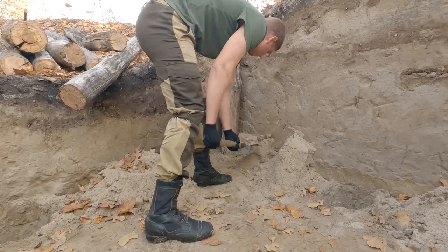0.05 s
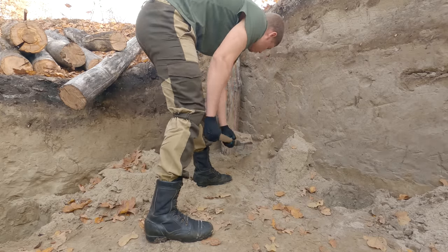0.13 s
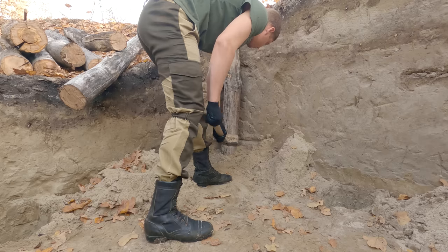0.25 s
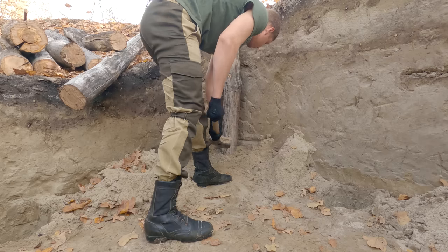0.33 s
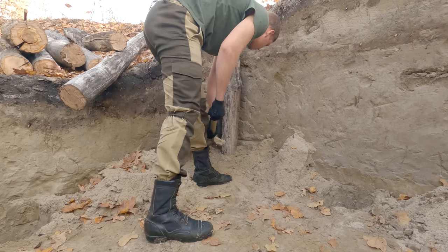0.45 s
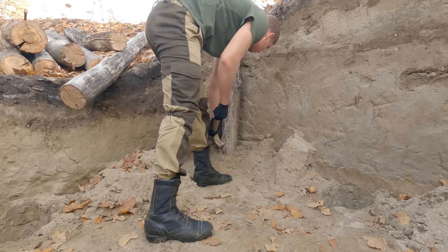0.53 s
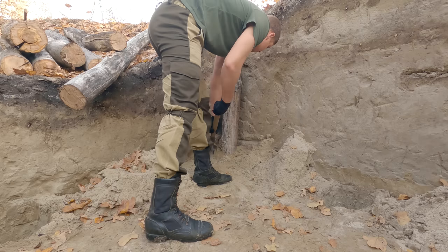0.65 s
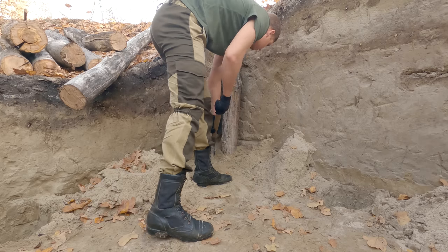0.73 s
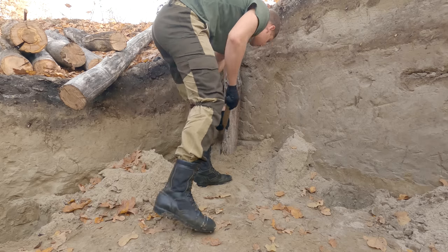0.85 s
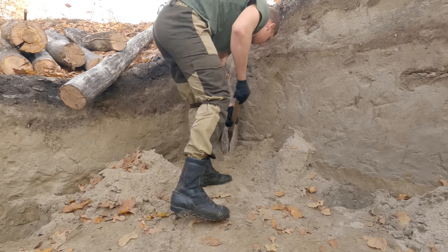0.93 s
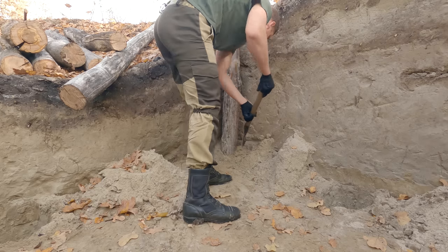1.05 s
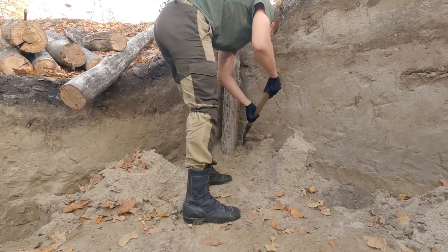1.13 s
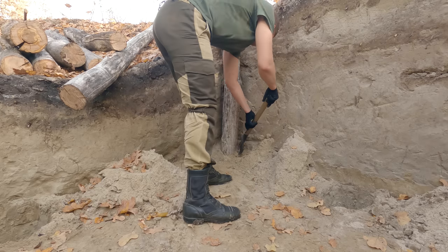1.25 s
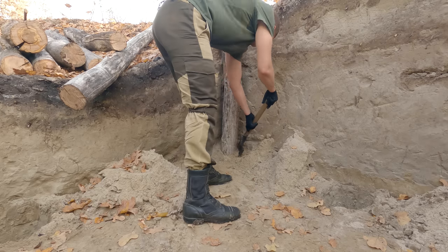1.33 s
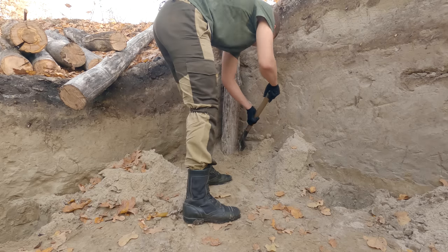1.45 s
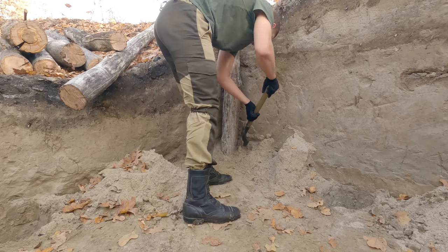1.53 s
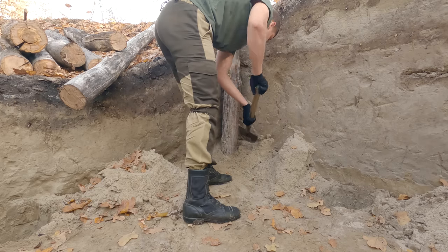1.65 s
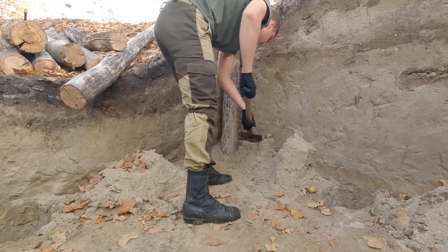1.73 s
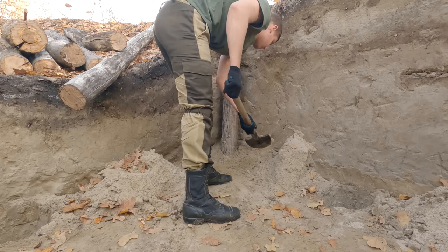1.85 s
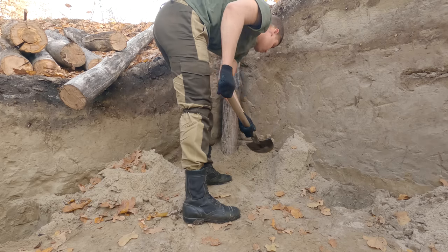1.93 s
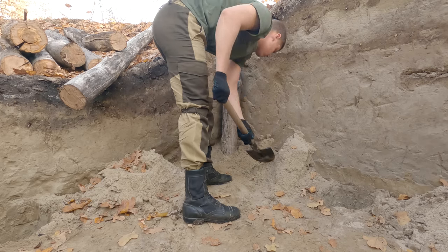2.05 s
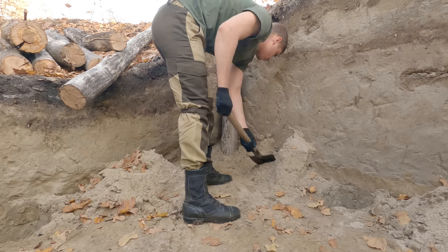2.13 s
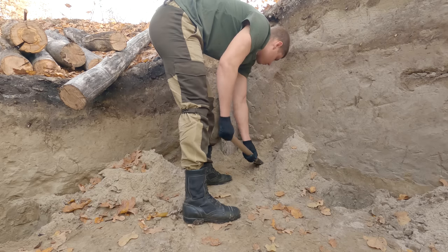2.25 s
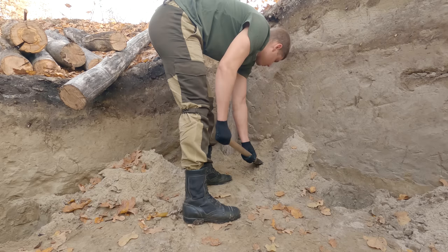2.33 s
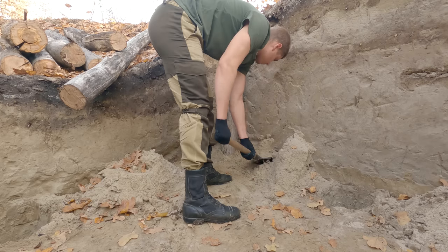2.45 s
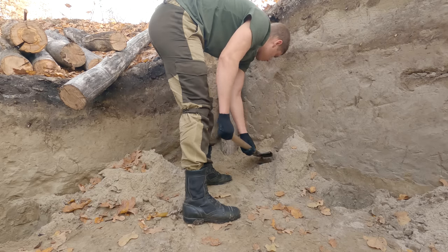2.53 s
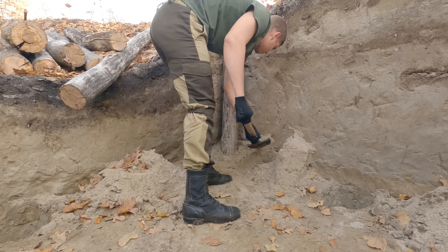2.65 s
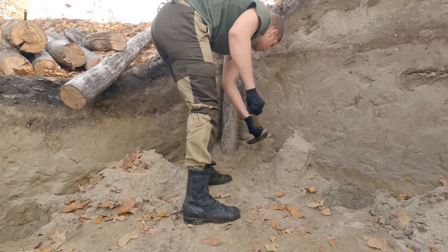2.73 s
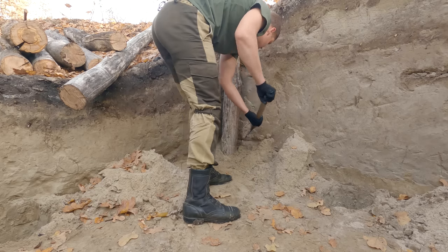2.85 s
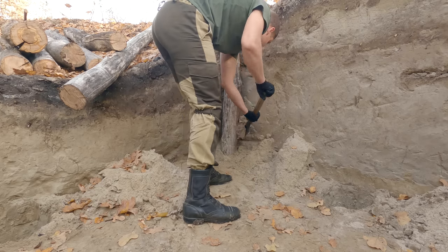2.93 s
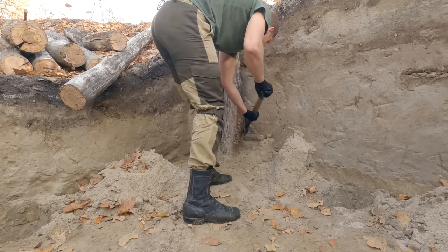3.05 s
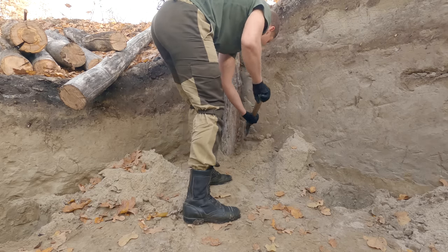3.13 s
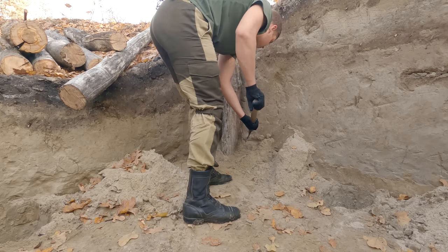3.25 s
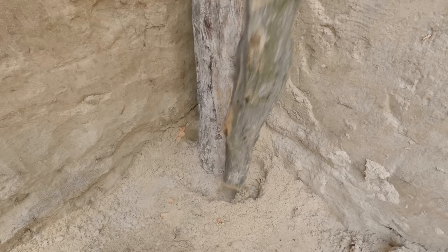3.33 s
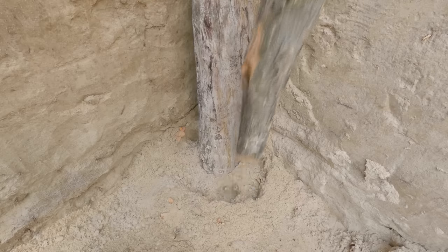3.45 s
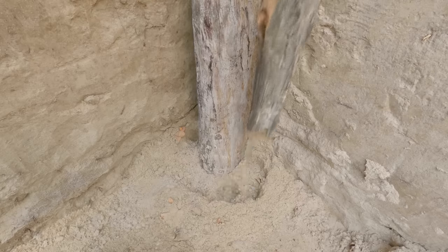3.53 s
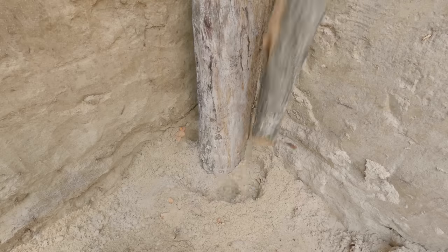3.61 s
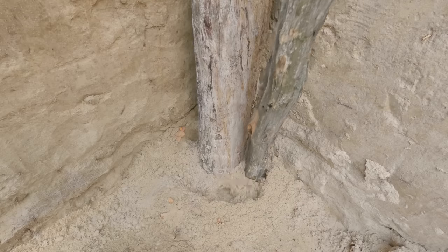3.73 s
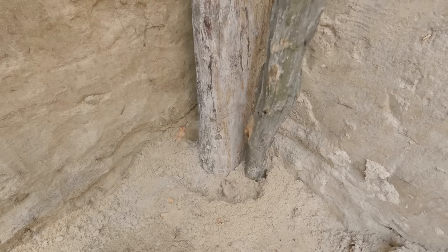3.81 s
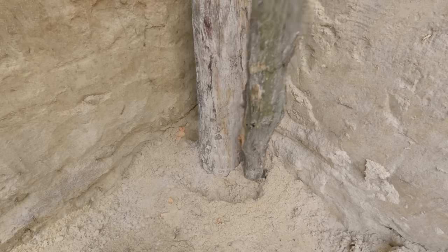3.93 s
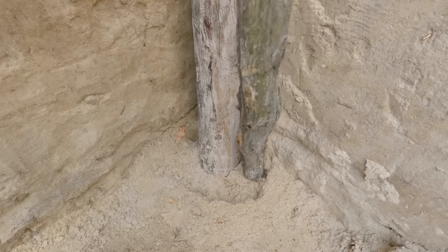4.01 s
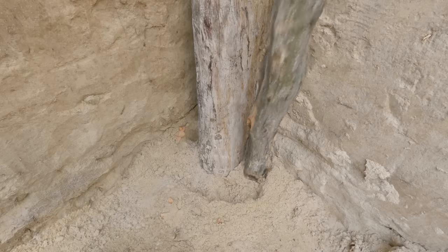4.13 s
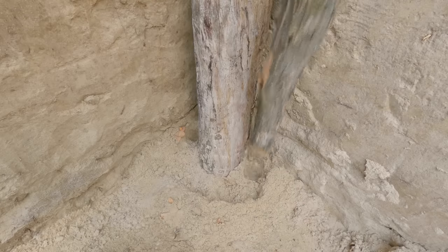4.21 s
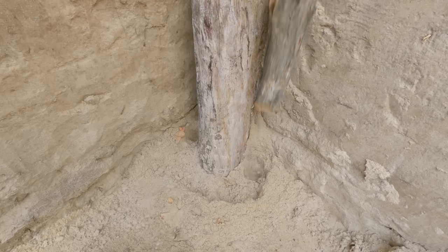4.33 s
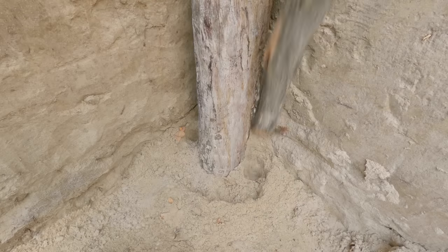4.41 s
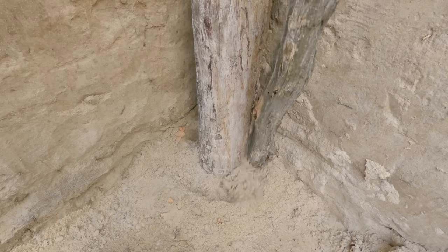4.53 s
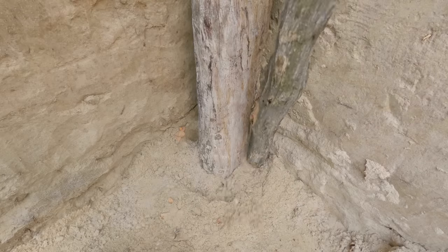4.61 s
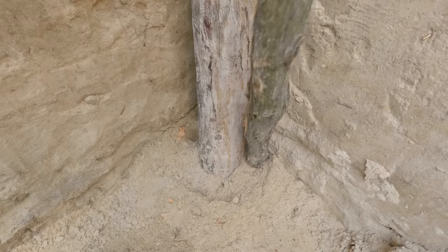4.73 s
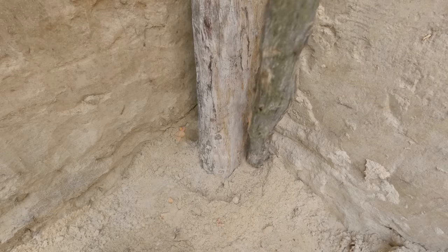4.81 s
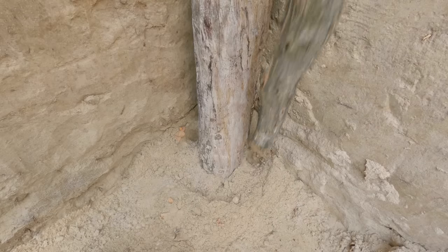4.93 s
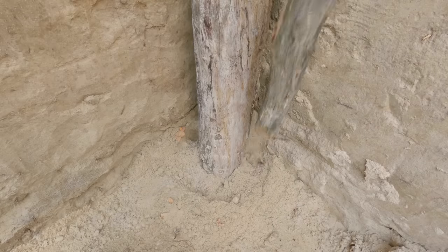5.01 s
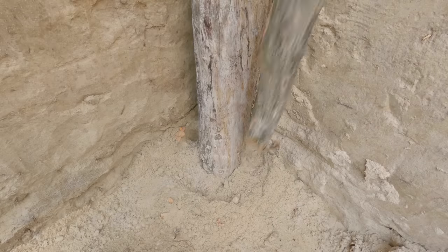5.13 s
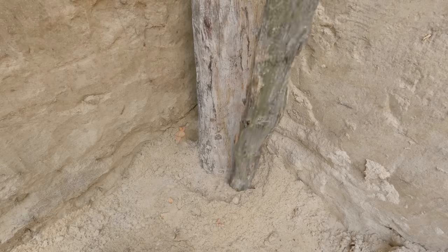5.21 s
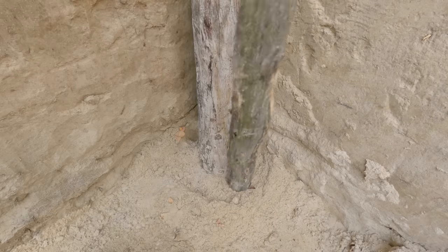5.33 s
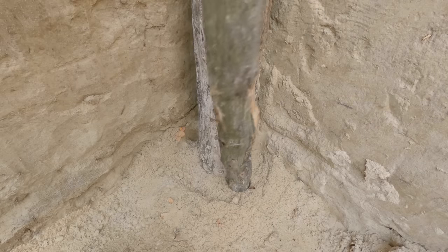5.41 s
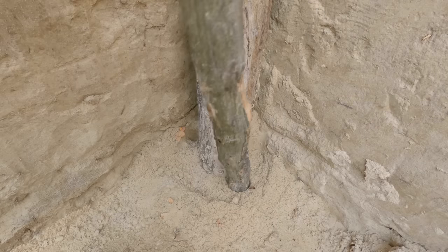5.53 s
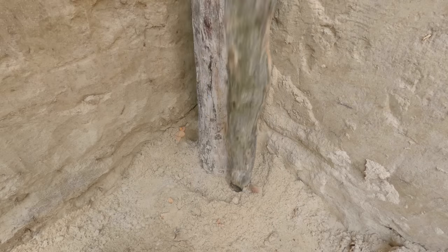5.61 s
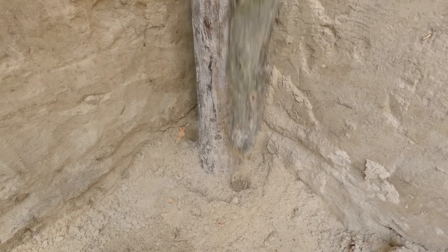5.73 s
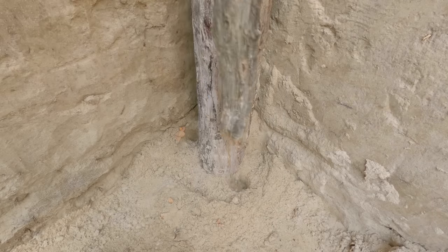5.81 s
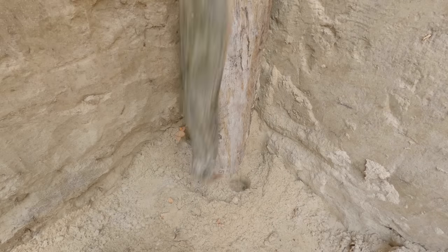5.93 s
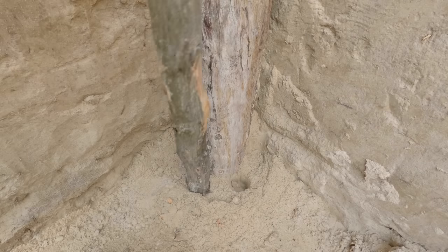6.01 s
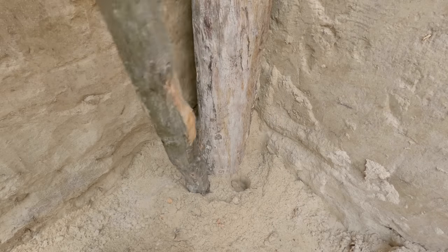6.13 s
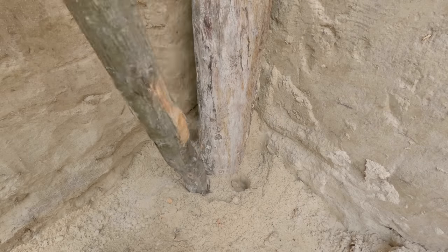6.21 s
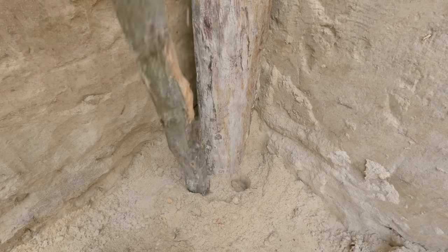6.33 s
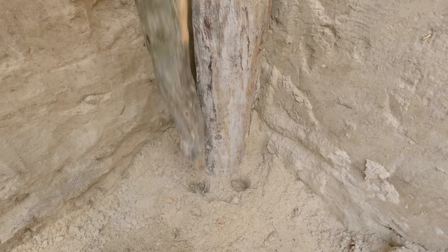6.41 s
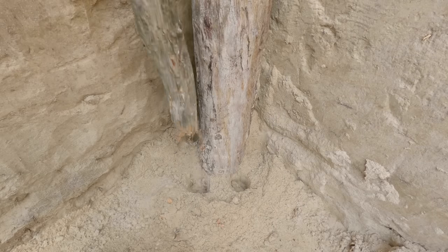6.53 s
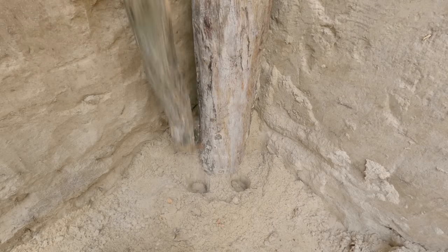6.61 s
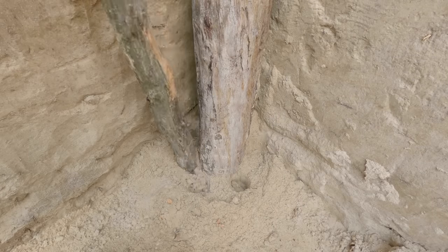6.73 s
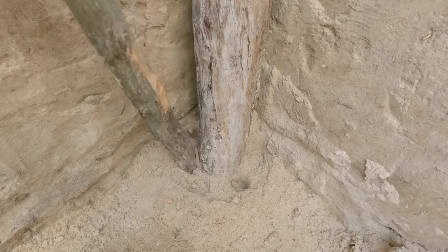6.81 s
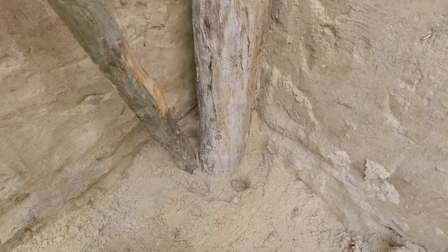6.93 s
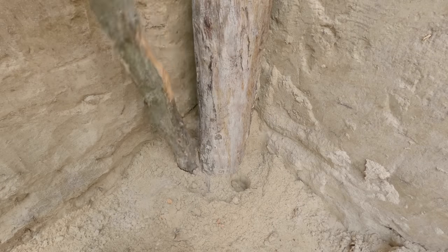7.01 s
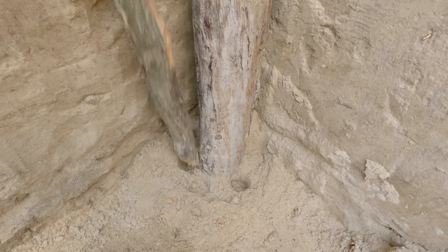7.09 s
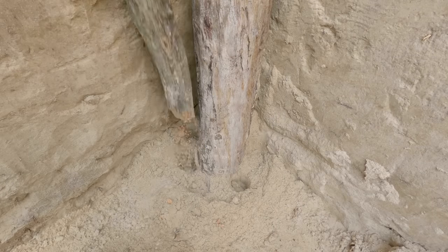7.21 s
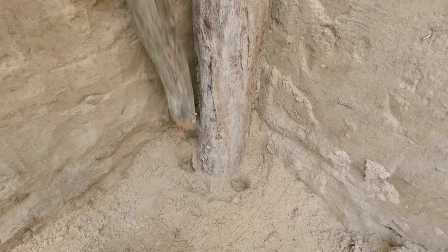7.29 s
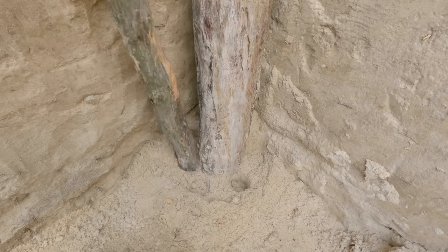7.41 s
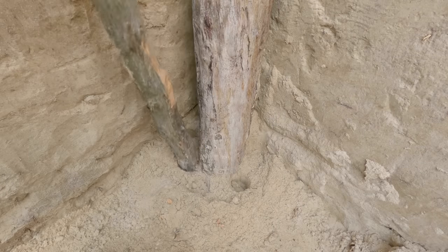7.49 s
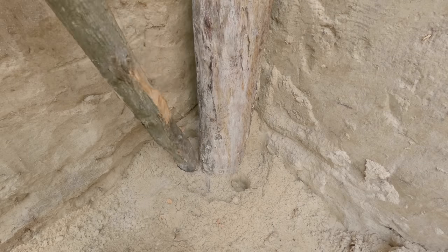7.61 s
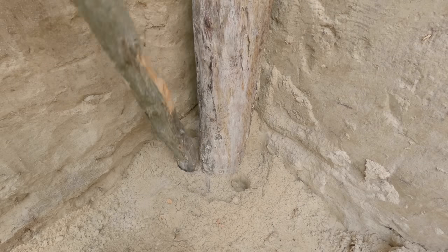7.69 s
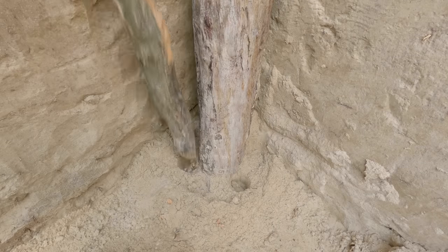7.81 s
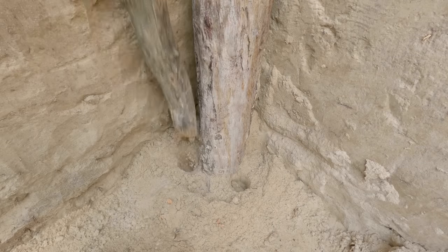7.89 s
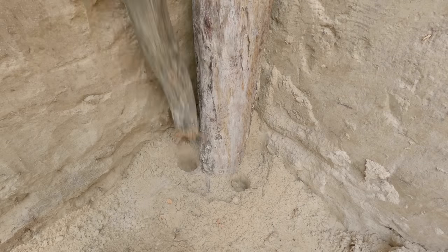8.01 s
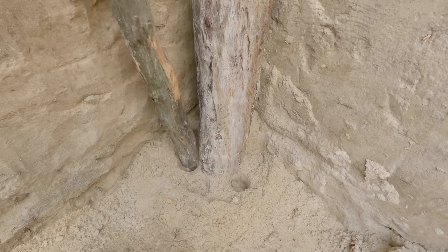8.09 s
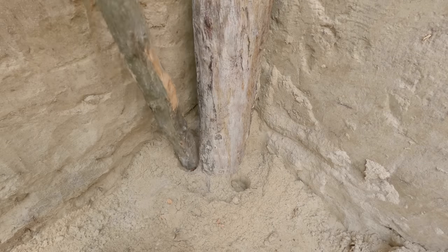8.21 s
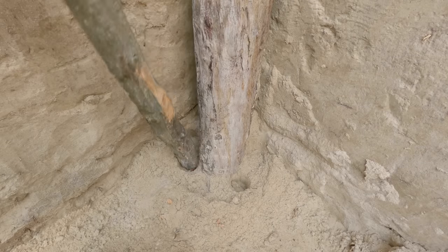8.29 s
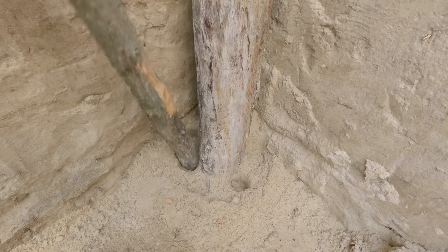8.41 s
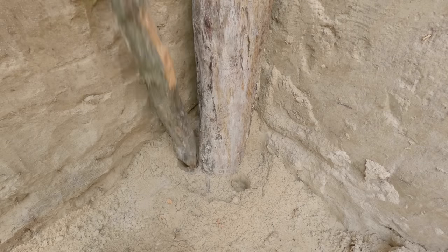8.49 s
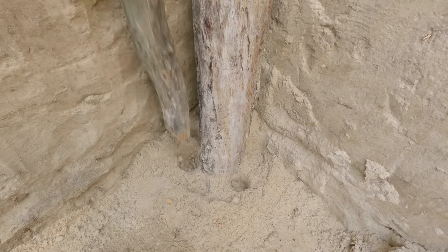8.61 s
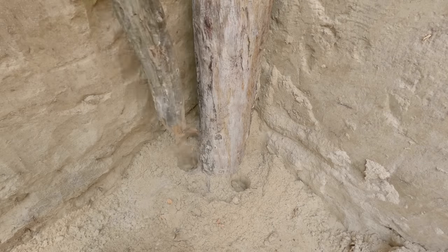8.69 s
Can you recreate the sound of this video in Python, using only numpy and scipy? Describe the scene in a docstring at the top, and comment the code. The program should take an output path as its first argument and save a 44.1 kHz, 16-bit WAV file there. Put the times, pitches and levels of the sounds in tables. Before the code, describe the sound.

Outdoors in a sandy pit, dry leaves hiss faintly and air rumbles softly, with light buffeting on the microphone. At a slight distance a shovel gives two knocks around 0.7 s, another at 1.1 and a harder, brighter metallic clack at 1.3, followed by gritty scraping to 1.4 and fainter sliding until about 2. A soft tap and clearer scrapes come at 2.2-2.3, then a light knock at 3.1. From 3.3 s the sound is close and drier, with a deeper air rumble. A log rams the sand beside a post at 3.8, 4.6, 5.3, 6.1, 6.8, 7.5 and 8.2 s: deep, short thuds with sandy crunch and woody knocks, the one at 6.1 mostly ground. Between them sand trickles, grit ticks, notably near 5.2, and the log clacks or rubs against the post, especially around 4.5, 5.3, 7.5 and 8.2.

```python
"""A shovel scrapes and knocks in a sand pit, then, from close by, a log thuds seven times into the sand by a post.
Behind them leaves hiss and air rumbles; sand crunches and slides, and the log also clacks against the post.
Struck wood, metal and ground are sums of dying tones; sand is clumped random grains that ring the tool.
Leaves and air are coloured noise; short echoes and a noise tail place the digging between sand walls."""
import sys
import numpy as np
from scipy import signal
from scipy.fft import rfft, irfft
from scipy.io import wavfile

SR = 44100
rng = np.random.default_rng(int(sys.argv[2]) if len(sys.argv) > 2 else 0)


def generate_wav(sig):
    """Save sig (samples, or channels by samples) to the path in sys.argv[1] as 16-bit PCM at SR."""
    pcm = np.round(np.clip(np.atleast_2d(sig).T, -1, 1) * 32767).astype(np.int16)
    wavfile.write(sys.argv[1], SR, pcm)


N = 385875
TIME = np.arange(N) / SR  # seconds

# In the tables, levels in dB are relative: a sound's own gain may come on top.
# Tones give their pitch and t60 (time to fade by 60 dB) before any pitch or damping factor.

# Still air in the open pit, then down at the post. Each row: frequency in Hz, level in dB per Hz.
FAR_AIR_COLOUR = [(70, -7), (110, -15), (175, 2.5), (230, -3), (300, 4), (420, -26), (800, -41),
                  (2000, -53)]
NEAR_AIR_COLOUR = [(12, -27), (28, -8.5), (52, 9.5), (80, 1.5), (110, -2.5), (150, -23.5), (220, -17),
                   (350, -27.5), (500, -34), (800, -44.5), (2000, -75)]
FAR_AIR_DB, NEAR_AIR_DB = -61.5, -44.5
CLOSE_S = 3.3  # from here on the air is heard down at the post
# Air buffeting the microphone. Each row: frequency in Hz, level in dB per Hz.
GUST_COLOUR = [(12, 5), (24, -7), (37, 8.5), (50, -11), (70, -54), (200, -68), (1000, -90)]
# Strength of the buffeting in the open pit. Each row: time in seconds, level in dB.
GUST_LEVELS = [(0, -41), (0.4, -50.5), (1.0, -45), (1.22, -43), (1.7, -56.5), (2.3, -51), (2.6, -39.5),
               (2.9, -50.5), (3.2, -46)]
# Dry leaves in the wood. Each row: frequency in Hz, level in dB per Hz.
LEAF_COLOUR = [(400, 5.5), (850, -5.5), (1300, 0), (1800, 1), (3200, -2.5), (4200, -2.5), (6000, -5.5),
               (8000, -7.5), (9200, -15.5), (11500, -21), (12800, -33), (15500, -43)]
# Strength of the leaf hiss. Each row: time in seconds, level in dB.
LEAF_LEVELS = [(0.0, -59.5), (1.46, -63.5), (2.85, -60), (3.19, -60.5), (5.04, -63), (5.53, -61),
               (5.7, -65), (8.19, -65.5), (8.75, -67)]
LEAF_GAIN_DB = 2

# How long the pit's tail lasts. Each row: frequency in Hz, t60 in seconds.
PIT_TAIL = [(60, 0.51), (200, 0.064), (500, 0.18), (1500, 0.085), (8000, 0.097)]
# Near echoes off the post, the ground and the walls. Each row: delay in seconds, level in dB.
NEAR_ECHOES = [(.0013, -44), (.0031, -19), (.0052, -24.5), (.0079, -21), (0.0133, -33)]

# Colour of crushed sand, then of scraped sand. Each row: frequency in Hz, level in dB per Hz.
CRUSHED_SAND = [(120, 14.5), (300, 5), (450, 4), (650, -3), (900, -2.5), (1400, 5), (2400, 2.5),
                (3400, 1.5), (4400, 1), (5800, -2.5), (7700, -5.5), (9000, -18), (11000, -20), (12500, -28),
                (15500, -38)]
SCRAPED_SAND = [(70, -15), (140, 11), (280, 5.5), (500, 2.5), (750, -1.5), (1000, -4), (1400, 4.5),
                (2100, 4), (3200, 3), (4300, 4.5), (6000, -2), (8000, -2), (9000, -15.5), (11000, -17),
                (15500, -32)]
# Sand settling deep down. Each row: frequency in Hz, level in dB per Hz.
CRUMBLE_COLOUR = [(60, -4), (130, 4.5), (200, 8), (290, -5), (420, -14), (600, -25.5), (900, -22),
                  (2500, -51)]

# Tones of the log. Each row: frequency in Hz, level in dB, t60 in seconds.
LOG_TONES = [(657, -1.5, 0.037), (837, 0, 0.066), (895, -7, 0.0054), (1100, -42, 0.034), (1424, 13, 0.0054),
             (1673, 8, 0.042), (2117, -2, 0.077), (2430, 5, 0.038), (3070, -17, 0.048), (3280, -39, .03),
             (4530, 0.5, 0.055), (5250, -36, .03)]
# Loose sand sliding as the log is worked free and lifted. Each row: peak in seconds, level in dB,
# length in seconds.
SAND_SLIDES = [(3.455, -47, 0.027), (3.938, -48, 0.013), (4.117, -52.5, 0.029), (4.461, -49, 0.014),
               (5.46, -54.5, 0.017), (5.595, -56, 0.039), (6.235, -51, 0.036), (6.36, -54.5, 0.063),
               (7.13, -57.5, 0.061), (7.85, -59, 0.045), (8.575, -53.5, 0.069)]
SLIDE_RISE_SHARE, SLIDE_RING_DB, SLIDE_HZ = 0.36, -9, 1980

# Single grits cracking against the wood. Each row: start in seconds, level in dB.
GRIT_TICKS = [(4.483, -51), (5.172, -36.5), (5.243, -50), (5.279, -33), (6.108, -46), (6.848, -48.5)]
# Tones of a grit. Each row: frequency in Hz, level in dB, t60 in seconds.
GRIT_TONES = [(1890, -11, 0.018), (2680, -12.5, .02), (4570, -9.5, 0.022), (5660, -16, 0.0091),
              (7170, -13.5, 0.012), (9500, -14, 0.0087), (13500, -25, 0.0067)]

# The log glancing off the post. Each row: time in seconds, rubbing in dB, clack in dB,
# pitch in Hz that the contact drives most.
LOG_GRAZES = [(4.436, -44, -46.5, 1100), (4.511, -43, -45, 900), (4.522, -41.5, -44, 1290),
              (4.554, -33, -62, 1000), (5.301, -29.5, -27.5, 1430), (6.443, -56.5, -53.5, 1680),
              (7.463, -30.5, -42, 2660), (7.486, -29, -35.5, 1180), (7.9, -55, -60, 1830),
              (8.170, -35.5, -39.5, 1500), (8.200, -37, -35.5, 885), (8.614, -48.5, -51.5, 1900)]
GRAZE_RISE_S, GRAZE_FALL_S, GRAZE_RING_DB = 0.003, 0.0073, -3.5
GRAZE_KNOCK_DB = -1  # knock of the post, relative to the rubbing level in the table

# Shovel blows. Each row: start in seconds, level in dB, pitch in Hz that the contact drives most,
# factor on the pitch of the tones, factor on the damping, thrown sand in dB.
SHOVEL_BLOWS = [(0.673, -31.5, 272, 0.98, 0.99, -38.5), (0.775, -30, 119, 0.96, 1.14, -75),
                (1.093, -26.5, 215, 0.99, 1.4, -41), (1.320, -25, 1880, 0.93, 1.2, -37),
                (1.324, -24.5, 374, 1.0, 1.1, -62), (1.329, -22, 990, 1.0, 1.03, -67),
                (2.167, -48, 1780, 1.0, 1.4, -58), (3.087, -37, 840, 1.12, 0.64, -42.5)]
# Tones of the shaft and blade. Each row: frequency in Hz, level in dB, t60 in seconds.
SHOVEL_TONES = [(157.4, 0, 0.11), (272.3, 3.5, 0.095), (318, 4.5, 0.038), (369, -15, 0.064),
                (406, -16, 0.11), (569, -11.5, 0.067), (755, -10, 0.13), (829, -22.5, 0.18),
                (953, -22.5, 0.18), (1288, -7.5, 0.11), (1500, -12.5, 0.037), (1710, -10, .12),
                (1654, 0, 0.032), (1780, -1.5, 0.087), (1957, -10, 0.21), (2100, -6.5, 0.062),
                (2226, -9, 0.099), (2430, -3.5, 0.049), (2493, -2.5, 0.059), (3160, -15.5, 0.17),
                (3470, -17, 0.038), (4200, -44, 0.031), (4580, -3, 0.078), (6100, -19, .06)]
# The blade sliding through sand. Each row: peak in seconds, level in dB, length in seconds.
BLADE_SCRAPES = [(0.746, -49, 0.033), (1.155, -51.5, 0.045), (1.378, -41.5, 0.042), (1.416, -43, 0.0086),
                 (1.545, -54.5, 0.08), (1.81, -57, 0.21), (2.205, -39.5, 0.034), (2.25, -40.5, 0.029),
                 (2.325, -50, 0.046), (3.335, -52.5, 0.02)]
SCRAPE_RISE_SHARE, SCRAPE_RING_DB, BLADE_HZ = 0.38, -11, 2220
# Sand that a blow throws up: delay of its peak, rise and fall in seconds, ringing of the blade in dB
BITE_LAG_S, BITE_RISE_S, BITE_FALL_S, BITE_RING_DB = 0.001, 0.0048, 0.015, -4.5

# Log strokes. Each row: time in seconds, push on the ground in dB, blow on the post in dB,
# delay of that blow in seconds, contact in seconds, factor on the ground's pitch,
# factor on the damping, crunch in dB, rise of the crunch in seconds.
LOG_STROKES = [(3.801, -6.5, -19.5, 0.0024, 0.00065, 0.98, 1.5, -26.5, 0.0057),
               (4.579, -17.5, -15, 0.0027, 0.00057, 0.78, 1.2, -26.5, 0.015),
               (5.304, -6, -12.5, 0.0012, 0.001, 0.968, 1.86, -26, 0.007),
               (6.060, -8.5, -39, 0.0027, 0.0005, 0.99, 1.42, -28, 0.0058),
               (6.758, -12, -10.5, 0.02, 0.00078, 1.0, 1.19, -30, 0.0057),
               (7.482, -14.5, -11.5, 0.0025, 0.00021, 0.99, 1.08, -31, 0.0053),
               (8.194, -10.5, -8, 0.0018, 0.00047, 1.04, 1.3, -29.5, 0.0064)]
# Packed ground, then the post standing in it. Each row: frequency in Hz, level in dB, t60 in seconds.
GROUND_TONES = [(29.8, -10.5, 0.26), (50, -1.5, 0.015), (73.3, 2.5, 0.31), (100.8, -12, 0.34),
                (122.5, 0.5, 0.14)]
POST_TONES = [(137.1, 4.5, 0.13), (187.2, -2, 0.15), (229, -3, 0.11), (274.5, -4, 0.089), (354, -4, 0.089),
              (433, -10.5, 0.13), (482, -17.5, 0.17), (548, -7.5, 0.087), (624, -6, 0.035), (770, -38, .06)]
# The crunch peaks just after the log lands: delay and fall in seconds, ringing of the log in dB,
# pitch in Hz that it drives most
CRUNCH_LAG_S, CRUNCH_FALL_S, CRUNCH_RING_DB, CRUNCH_HZ = 0.0066, 0.0072, -21, 2400

EDGE_HZ = 15650  # upper limit of the recorder


def gain_of(db):
    """Turns decibels into a factor."""
    return 10 ** (np.asarray(db) / 20)


def evened(x):
    """Scales a signal to an average (rms) strength of 1."""
    return x / np.sqrt(np.mean(x ** 2) + 1e-20)


def read(points, hz):
    """Reads a table between its rows, with frequency on a logarithmic scale."""
    f, value = np.transpose(points)
    return np.interp(np.log(hz + 1), np.log(f + 1), value)


def coloured(x, spectrum):
    """Gives a steady signal the balance of bass and treble in a table, at rms 1."""
    gains = gain_of(read(spectrum, np.fft.rfftfreq(N, 1 / SR)))
    return evened(irfft(rfft(x) * gains, N))


def wander(per_s):
    """Random drift of rms 1, with no movement faster than the given rate in Hz."""
    slow = np.fft.rfftfreq(N, 1 / SR) < per_s
    return evened(irfft(rfft(rng.standard_normal(N)) * slow, N))


def add(mix, s, sound):
    """Mixes a sound in at a time in seconds."""
    part = mix[max(round(s * SR), 0):][:len(sound)]
    part += sound[:len(part)]


def ring(modes, pitch=1, damping=1):
    """A struck body rings in dying tones; neighbouring tones swing in opposite directions."""
    t = np.arange(SR // 2) / SR
    out = np.zeros(len(t))
    for k, (hz, db, t60) in enumerate(modes):
        fade = np.exp(-np.log(1000) * t * damping / t60)
        out += (-1) ** k * gain_of(db) * fade * np.sin(2 * np.pi * hz * pitch * t)
    return out


def driven(modes, hz):
    """A contact feeds most the tones near its own pitch."""
    rows = []
    for f, db, t60 in modes:
        ratio = f / hz
        rows.append((f, db + 15 * np.log10(2 * ratio ** 2 / (1 + ratio ** 4)), t60))
    return rows


def force(contact_s, yield_s, yield_share):
    """The push builds while the sand yields, then the log stops: gives (lead in seconds, pulse)."""
    t = np.arange(-SR // 30, SR // 100) / SR
    stop = np.exp(-.5 * (t / contact_s) ** 2)
    yielding = np.where(t < 0, np.exp(t / yield_s), stop)
    return -t[0], (stop + yield_share * yielding) / stop.sum()


def swells(rows, rise_share, ring_db, hz):
    """A sliding stroke swells for a share of its length and fades for the rest."""
    share = np.clip(rise_share, .1, .9)
    return [(s, db, share * length, (1 - share) * length, ring_db, hz) for s, db, length in rows]


def sand(strokes, spectrum, modes, grains_per_s, spread_db, damping):
    """Grains slip in clumps while a tool presses in; they hiss and ring the tool, damped by the sand."""
    size = gain_of(spread_db * np.minimum(rng.exponential(1, N), 4))
    clumps = gain_of(1.8 * wander(300))
    present = rng.random(N) < grains_per_s / SR
    grains = evened(rng.standard_normal(N) * size * clumps * present)
    hiss = coloured(grains, spectrum)
    out = np.zeros(N)
    grips = rng.uniform(.98, 1.02, len(strokes))  # each new grip shifts the pitch a little
    for (s, db, rise, fall, ring_db, hz), grip in zip(strokes, grips):
        span = slice(round((s - 8 * rise) * SR), round((s + 8 * fall) * SR))
        t = TIME[span] - s
        steps = np.where(t < 0, t / rise, t / fall)
        press = gain_of(db) * np.exp(1 - np.hypot(1, steps))  # round top, exponential flanks
        body = ring(driven(modes, hz), grip, damping)
        ringing = signal.fftconvolve(grains[span] * press, body / np.linalg.norm(body))
        add(out, s + t[0], hiss[span] * press)
        add(out, s + t[0], gain_of(ring_db) * ringing)
    echoes = sum(gain_of(db) * np.roll(out, round(late * SR)) for late, db in NEAR_ECHOES)
    return out + echoes


def pit(x, wet_db):
    """Sand walls scatter a short tail in which the bass lasts longest."""
    taps = rng.standard_normal(SR // 2) * (np.arange(SR // 2) > .012 * SR)
    hz, t, z = signal.stft(taps, SR, nperseg=256)
    fade = np.exp(-np.log(1000) * t / read(PIT_TAIL, hz)[:, None])
    tail = signal.istft(z * fade, SR, nperseg=256)[1]
    return x + gain_of(wet_db) * signal.oaconvolve(x, tail / np.linalg.norm(tail))[:N]


def woods():
    """Leaves hiss while air rumbles, with more body down by the post."""
    near = np.clip((TIME - CLOSE_S) / 0.0089, 0, 1)
    gust_gain = gain_of(np.interp(TIME, *np.transpose(GUST_LEVELS)))
    gusts = gust_gain * coloured(rng.standard_normal(N), GUST_COLOUR)
    far_air = gain_of(FAR_AIR_DB) * coloured(rng.standard_normal(N), FAR_AIR_COLOUR)
    near_gain = gain_of(NEAR_AIR_DB + 2 * wander(1.4))
    near_air = near_gain * coloured(rng.standard_normal(N), NEAR_AIR_COLOUR)
    rustle = coloured(rng.standard_normal(N) * gain_of(1.0 * wander(1700)), LEAF_COLOUR)
    leaf_db = LEAF_GAIN_DB + np.interp(TIME, *np.transpose(LEAF_LEVELS)) + 1.1 * wander(22)
    return (1 - near) * (far_air + gusts) + near * near_air + gain_of(leaf_db) * rustle


def slides():
    """Loose sand runs back along the log in separate grains."""
    runs = swells(SAND_SLIDES, SLIDE_RISE_SHARE, SLIDE_RING_DB, SLIDE_HZ)
    return gain_of(-2) * sand(runs, CRUSHED_SAND, LOG_TONES, grains_per_s=2200, spread_db=3.5, damping=0.77)


def ticks():
    """Each grit cracks once, short and bright, at a pitch of its own."""
    out = np.zeros(N)
    for s, db in GRIT_TICKS:
        add(out, s, gain_of(db) * ring(GRIT_TONES, rng.uniform(0.87, 1.14)))
    return out


def grazes(contact_s=0.00063):
    """Wood glances off wood: the log clacks, grit between them rings it on, and the post knocks lightly."""
    rubs = [(s, db, GRAZE_RISE_S, GRAZE_FALL_S, GRAZE_RING_DB, hz) for s, db, _, hz in LOG_GRAZES]
    rubbing = sand(rubs, CRUSHED_SAND, LOG_TONES, grains_per_s=7100, spread_db=0, damping=1.0)
    out = gain_of(-1.5) * rubbing
    lead, push = force(contact_s, yield_s=0.003, yield_share=0.063)
    knock = signal.fftconvolve(ring(POST_TONES), push)
    for s, db, clack_db, hz in LOG_GRAZES:
        add(out, s - lead, gain_of(db + GRAZE_KNOCK_DB) * knock)
        add(out, s, gain_of(clack_db) * ring(driven(LOG_TONES, hz), damping=1.0))
    return out


def shovel():
    """Each contact rings the shovel most near its own pitch; sparse grit ticks among the fine sand."""
    out = np.zeros(N)
    strokes = swells(BLADE_SCRAPES, SCRAPE_RISE_SHARE, SCRAPE_RING_DB, BLADE_HZ)
    for s, db, hz, pitch, damping, sand_db in SHOVEL_BLOWS:
        add(out, s, gain_of(db) * ring(driven(SHOVEL_TONES, hz), pitch, damping))
        strokes.append((s + BITE_LAG_S, sand_db, BITE_RISE_S, BITE_FALL_S, BITE_RING_DB, BLADE_HZ))
    fine = sand(strokes, SCRAPED_SAND, SHOVEL_TONES, grains_per_s=8000, spread_db=-1.5, damping=1.1)
    grit = sand(strokes, SCRAPED_SAND, SHOVEL_TONES, grains_per_s=800, spread_db=2.5, damping=0.89)
    return out + gain_of(-5) * (fine + grit)


def rammer(yield_s=0.0035, yield_share=0.28, crumble_db=-20, crumble_rise_s=0.0052, crumble_s=0.027):
    """Sand yields until the log stops: ground thuds and crumbles, post knocks, duller for longer contact."""
    out, settling, crunches = np.zeros(N), np.zeros(N), []
    for s, ground_db, post_db, late, contact, pitch, damping, crunch_db, rise in LOG_STROKES:
        lead, push = force(contact, yield_s, yield_share)
        thud = signal.fftconvolve(ring(GROUND_TONES, pitch, damping), push)
        knock = signal.fftconvolve(ring(POST_TONES, 0.96, damping), push)
        add(out, s - lead, gain_of(ground_db) * thud)
        add(out, s + late - lead, -gain_of(post_db) * knock)  # starts the opposite way to the ground
        swell = np.exp(np.minimum((TIME - s) / crumble_rise_s, (s - TIME) / crumble_s))
        settling += gain_of(ground_db) * swell
        crunches.append((s + CRUNCH_LAG_S, crunch_db, rise, CRUNCH_FALL_S, CRUNCH_RING_DB, CRUNCH_HZ))
    crumble = gain_of(crumble_db) * settling * coloured(rng.standard_normal(N), CRUMBLE_COLOUR)
    crunch = sand(crunches, CRUSHED_SAND, LOG_TONES, grains_per_s=10000, spread_db=2, damping=0.82)
    return gain_of(-4.0) * out + crumble + gain_of(-1.5) * crunch


def scene():
    """Shovel and log sound in the pit, with the woods around."""
    digging = pit(shovel(), wet_db=-10.0)
    ramming = pit(rammer() + grazes() + slides() + ticks(), wet_db=-24.5)
    return (digging + ramming + woods())[None]


def record(dry):
    """The microphone loses the lowest bass; then the recorder cuts the highest treble."""
    thinned = signal.sosfilt(signal.butter(2, 16, "highpass", fs=SR, output="sos"), dry)
    band_limit = signal.firwin(511, EDGE_HZ, window=("kaiser", 9), fs=SR)
    return signal.oaconvolve(thinned, band_limit[None], "same")


dry = scene()
out = record(dry)
generate_wav(out)
```